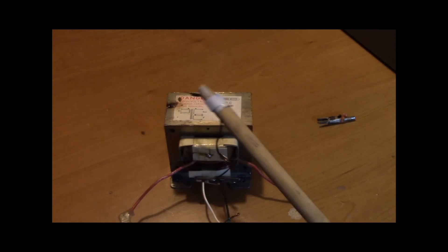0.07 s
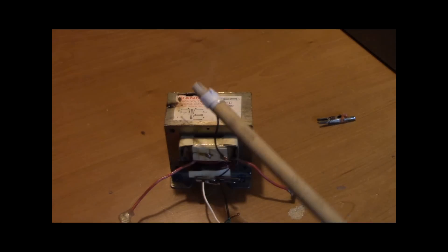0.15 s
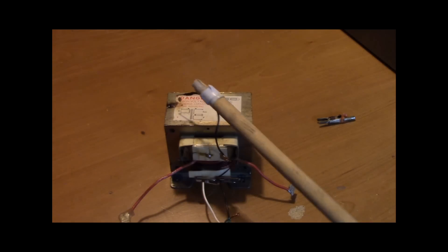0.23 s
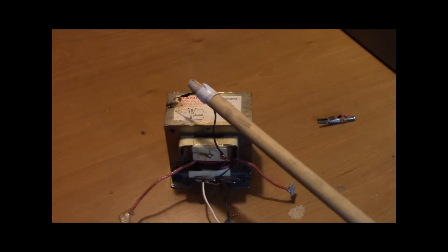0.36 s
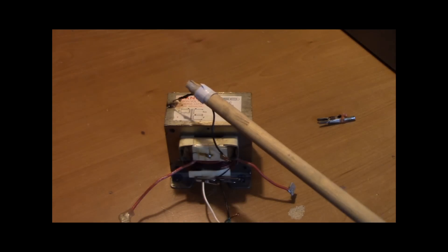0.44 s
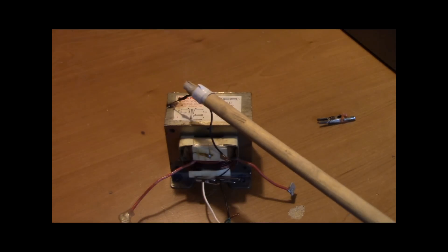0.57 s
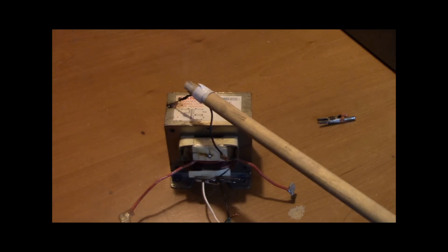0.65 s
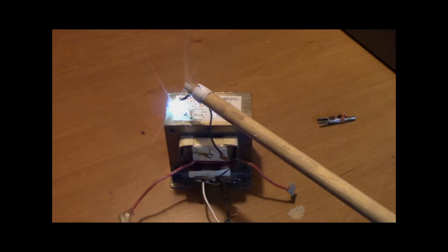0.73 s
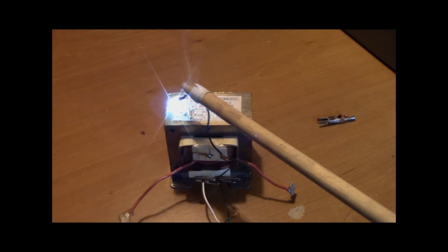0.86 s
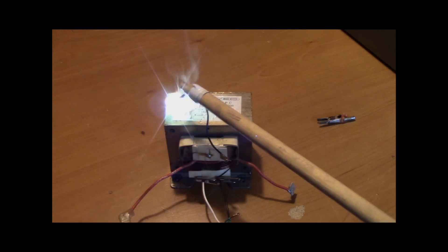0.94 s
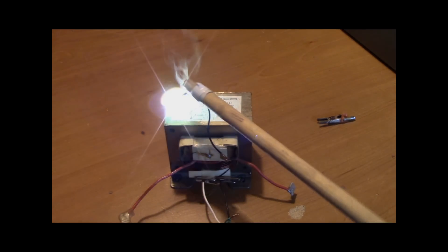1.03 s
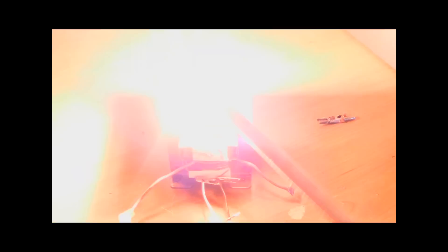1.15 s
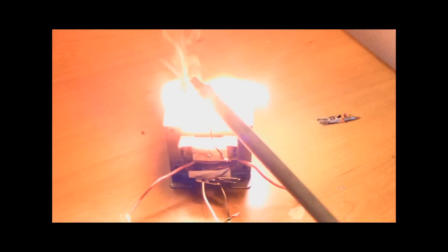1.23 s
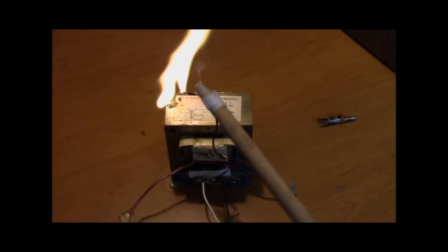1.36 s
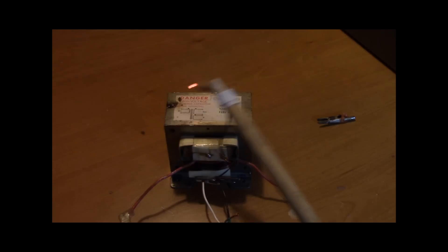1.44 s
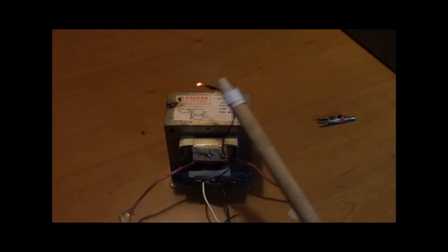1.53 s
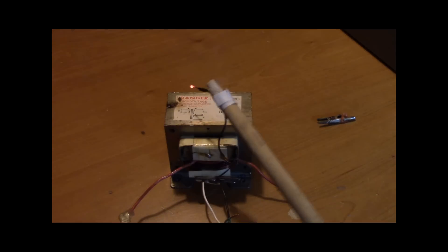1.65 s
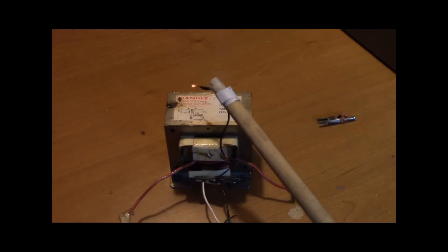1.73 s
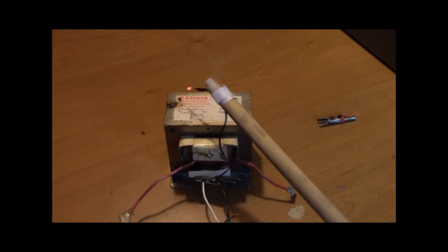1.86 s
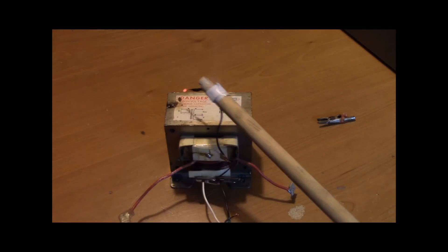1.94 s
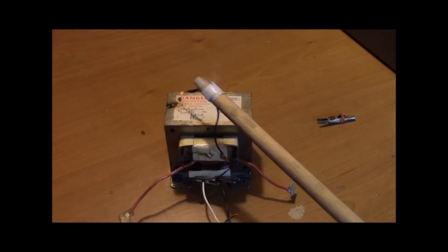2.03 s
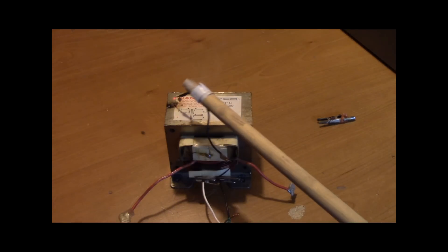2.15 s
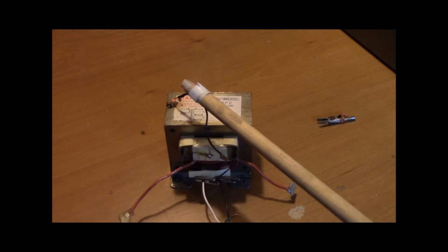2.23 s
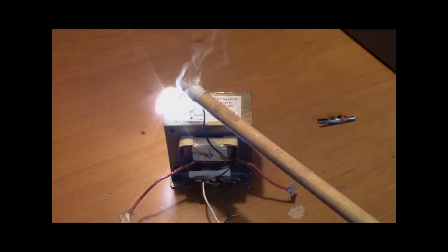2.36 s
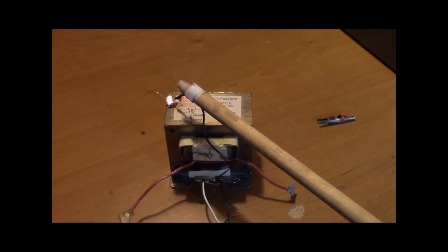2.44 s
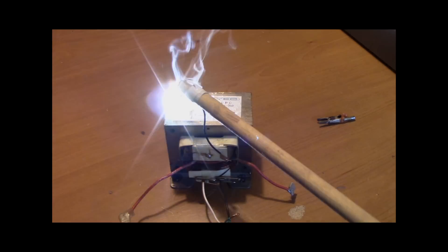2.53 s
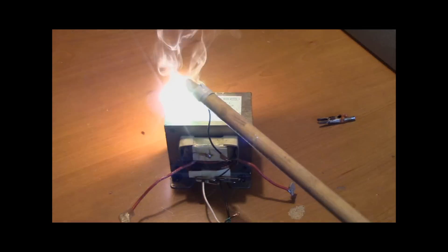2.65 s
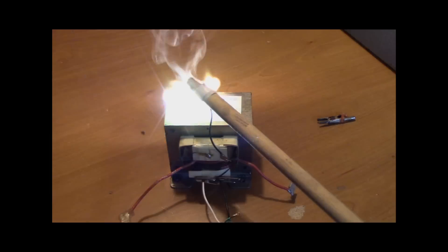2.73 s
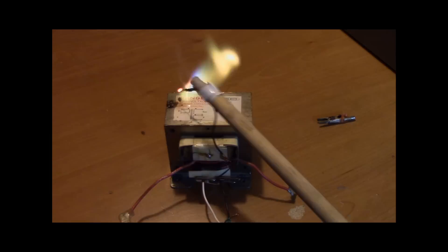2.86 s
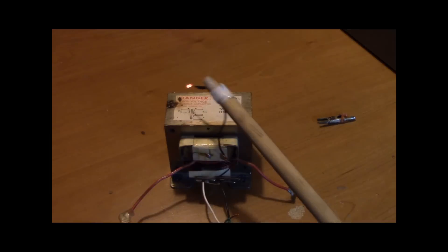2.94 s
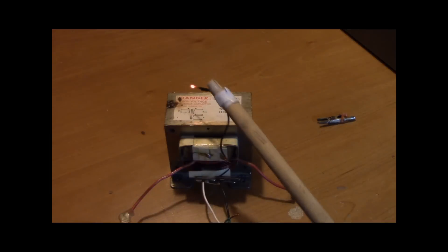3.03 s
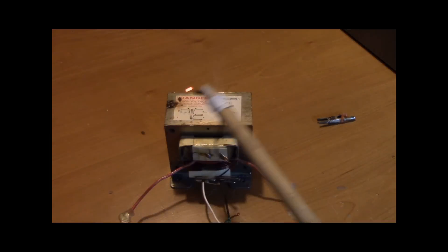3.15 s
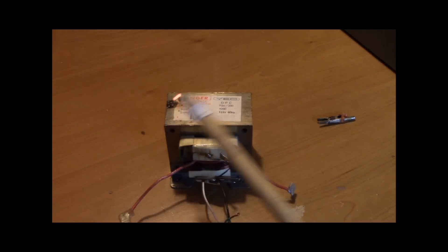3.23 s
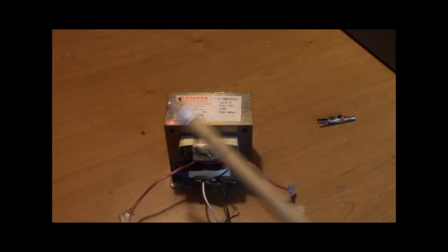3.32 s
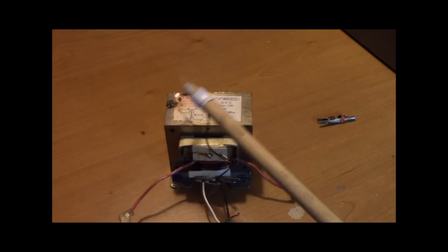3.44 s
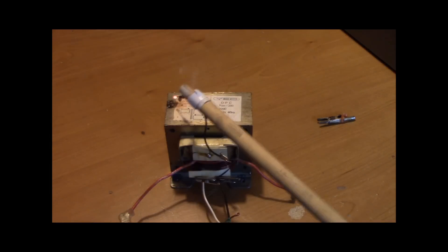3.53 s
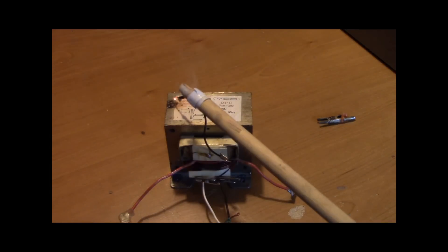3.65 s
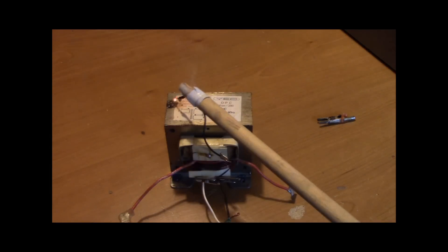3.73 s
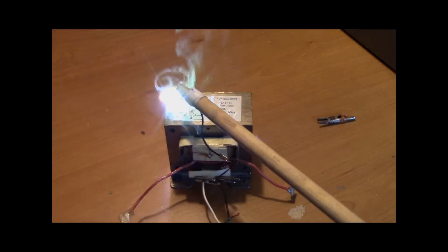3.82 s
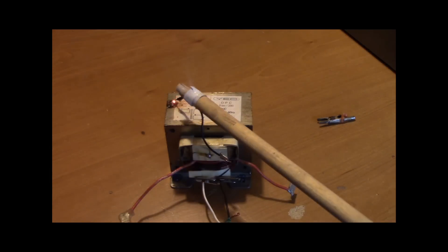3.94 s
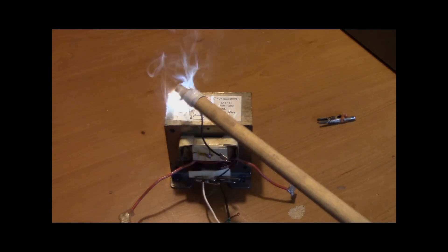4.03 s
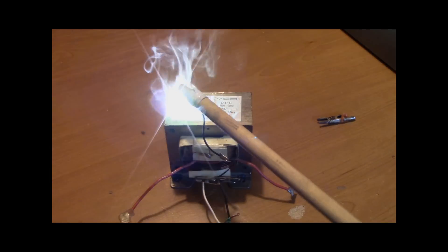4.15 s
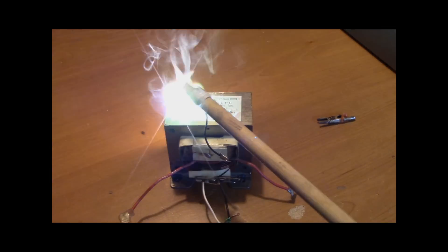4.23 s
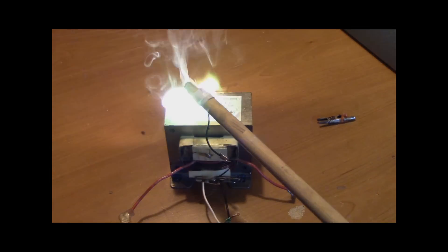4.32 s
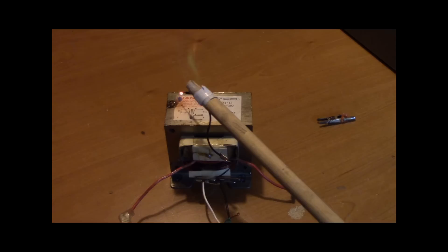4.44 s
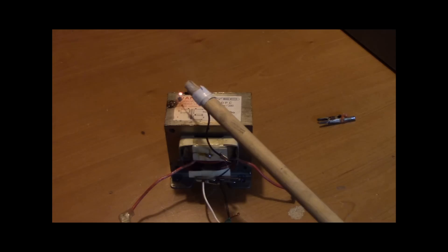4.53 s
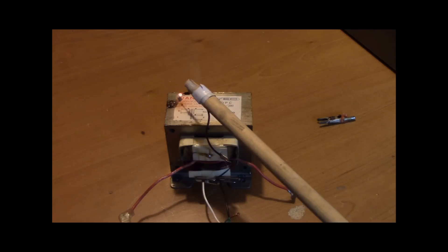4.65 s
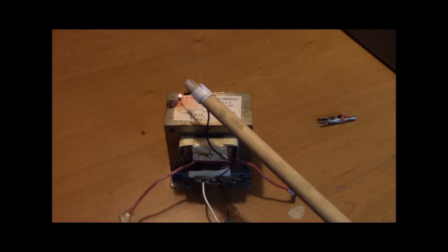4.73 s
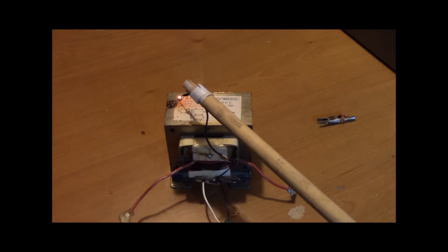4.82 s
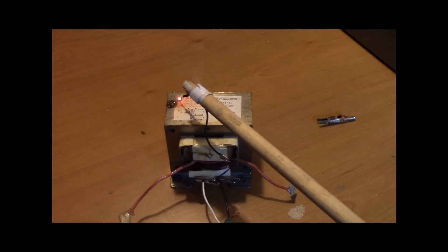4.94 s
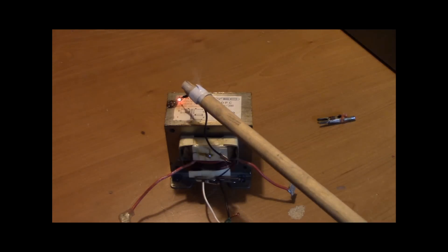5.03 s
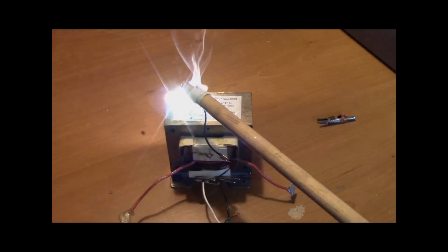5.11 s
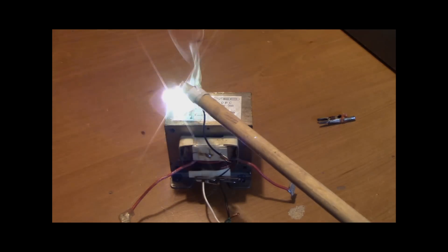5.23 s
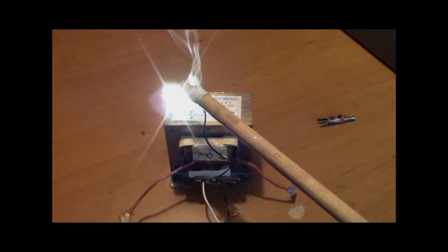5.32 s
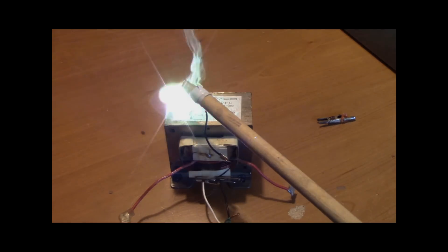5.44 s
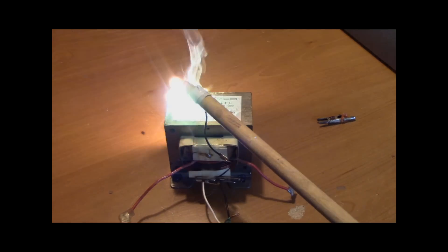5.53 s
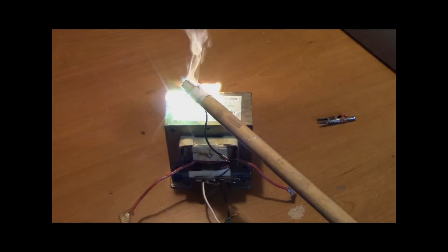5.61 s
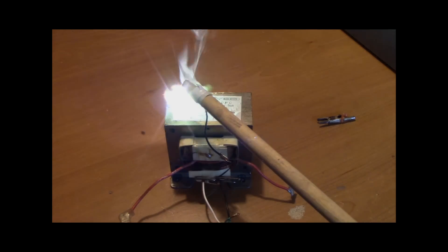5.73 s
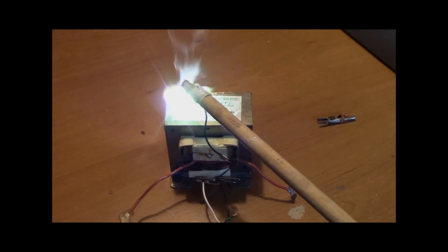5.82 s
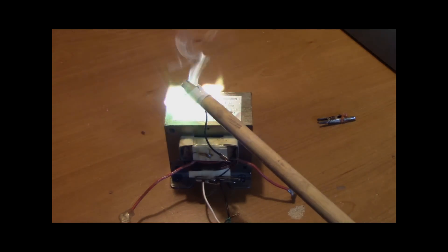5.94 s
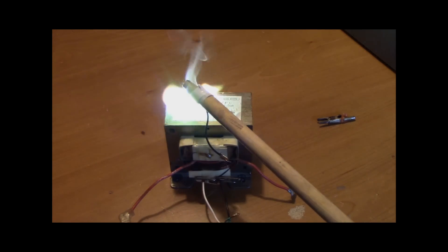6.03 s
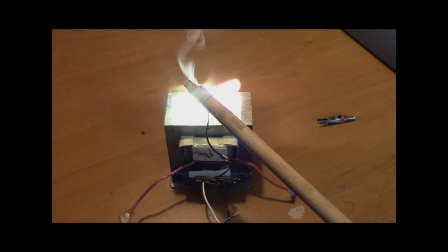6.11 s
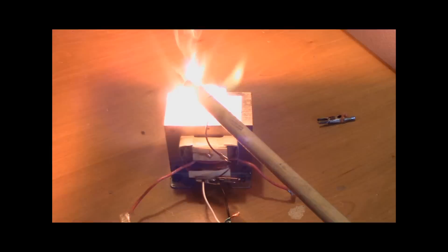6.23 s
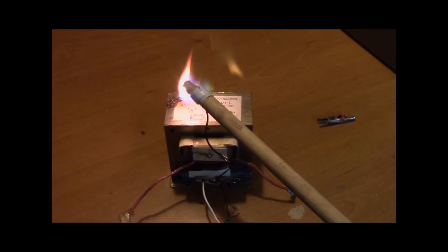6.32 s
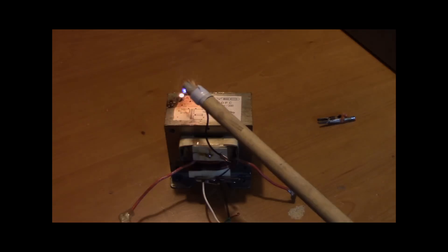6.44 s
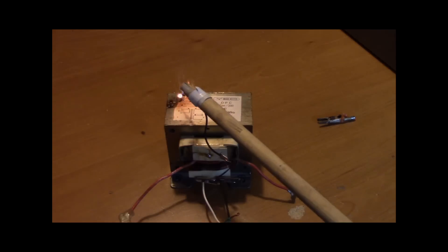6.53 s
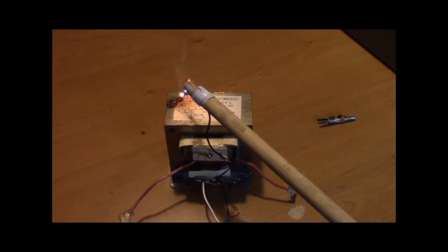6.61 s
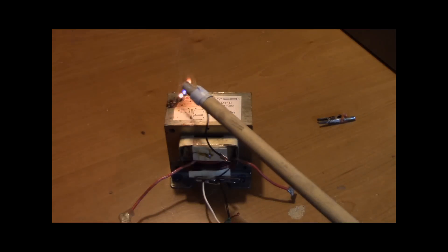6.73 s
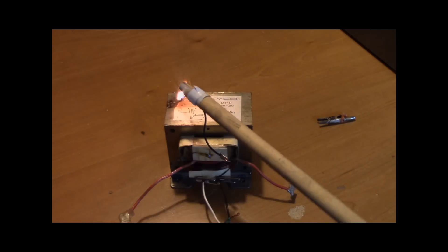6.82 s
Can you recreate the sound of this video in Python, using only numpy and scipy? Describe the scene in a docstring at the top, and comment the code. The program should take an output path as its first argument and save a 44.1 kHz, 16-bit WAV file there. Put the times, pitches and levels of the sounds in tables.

```python
"""Arcs drawn from a humming transformer

A mains transformer hums on a wooden table in a small, dry room; a hand-held electrode draws arcs from it.
Gas breakdown cracks in each half-cycle, tiny sparks sizzle, and heated air buzzes at twice the mains rate:
all are pulse trains convolved with a pressure pulse and a room response. Around them are sine-wave hum and
gliding whistles, ticks and a pop made as struck responses, and spectrally shaped noise as room tone."""
import sys
import numpy as np
from scipy import signal
from scipy.fft import rfft, irfft
from scipy.io import wavfile

SR = 44100
rng = np.random.default_rng(int(sys.argv[2]) if len(sys.argv) > 2 else 0)


def wav_out(sig):
    """Save sig, one row per channel (or a flat mono array), as 16-bit PCM at SR to the path in sys.argv[1]."""
    wavfile.write(sys.argv[1], SR, np.round(np.clip(np.atleast_2d(sig).T, -1, 1) * 32767).astype(np.int16))


N = 302967

MAINS_HZ = 60.01
FIRST_STRIKE_S = .0033  # nominal moment of breakdown within the first mains cycle

# Levels of the burning arcs, one list per arc.
# Each row: time in seconds, restrike level in dB, buzz level in dB.
ARC_LEVELS = [
    [(0.96, -16, -38.5), (1.05, -11.5, -27.5), (1.102, -13, -16), (1.126, -25, -13), (1.216, -30.5, -19.5),
     (1.242, -27, -27), (1.268, -35, -12), (1.336, -27.5, -21.5)],
    [(2.278, -17, -17.5), (2.372, -20, -28.5)],
    [(2.553, -22.5, -27), (2.685, -16, -17.5), (2.771, -25.5, -19), (2.795, -15, -19.5), (2.816, -35, -24)],
    [(3.795, -22.5, -25.5), (3.857, -15.5, -29), (3.872, -21, -41.5)],
    [(4.052, -18.5, -40), (4.2, -10.5, -28), (4.27, -14.5, -19.5), (4.405, -17, -18)],
    [(5.122, -15, -20.5), (5.18, -12.5, -19), (5.276, -16, -42.5), (5.296, -27.5, -39), (5.312, -13.5, -49),
     (5.45, -13, -34), (5.528, -12.5, -23.5), (5.7, -13.5, -22.5), (5.8, -13, -25.5), (6.04, -15.5, -18.5),
     (6.08, -15, -15.5), (6.176, -13, -19.5), (6.212, -25.5, -19), (6.23, -12, -20), (6.272, -31, -17)],
]
# Dullness that each arc has from its start. Each entry: share of dulled sound, 0 to 1.
ARC_THICKNESS = [0.18, 0.042, 0.17, 0.084, 0.16, 0.031]


def arc_levels():
    """Channel growth: the louder the buzz of a long arc, the duller its sparks."""
    strike_db, buzz_db = in_time(ARC_LEVELS)
    spans = [[(rows[0][0], share), (rows[-1][0], share)]
             for rows, share in zip(ARC_LEVELS, ARC_THICKNESS)]
    thick, = in_time(spans)
    dulling_starts_db, dulling_per_db = -28, .025
    dull = thick + dulling_per_db * np.maximum(buzz_db - dulling_starts_db, 0)
    return strike_db, buzz_db, dull


# Loudest cracks. Each row: time in seconds, peak in dB before dulling and the room.
LOUD_CRACKS = [(0.7, -28), (0.948, -9), (0.961, 2.5), (0.977, 5), (1.107, 9), (1.126, 11.5), (1.232, -7),
               (1.26, 2.5), (1.274, -2.5), (2.268, -18.5), (2.278, 3), (2.296, 5.5), (2.309, 7.5),
               (2.345, 5.5), (2.36, 2.5), (2.52, -1), (2.56, 4.5), (2.578, 7), (2.61, 5.5), (2.629, 9),
               (2.725, 7.5), (2.777, 5.5), (2.794, 3), (3.785, -4), (3.803, 4), (3.845, 2.5), (3.98, -19),
               (4.052, 3), (4.069, 1), (4.101, 1.5), (4.142, 2), (4.293, 8.5), (4.343, 8), (4.392, 8),
               (5.099, -12.5), (5.125, 7.5), (5.308, 5.5), (5.493, 4.5), (5.958, 5.5), (6.058, 5),
               (6.225, 4.5), (6.242, 2.5)]
# Spectrum of one spark. Each row: frequency in Hz, relative level in dB per Hz.
SPARK_SPECTRUM = [(40, -7.5), (100, -17), (300, -12.5), (550, -9.5), (1200, -6), (2200, -5.5), (4500, -6.5),
                  (7000, -7.5), (10000, -14.5), (16000, -25.5)]


def loud_cracks(dull):
    """Impulse radiation: a sudden breakdown sends out one sharp pressure pulse."""
    struck = dulled(clicks(LOUD_CRACKS), dull, edge_hz=3740)
    return through(struck, through(pulse(SPARK_SPECTRUM), room()))


# Balance of the two polarities, held until the next row.
# Each row: start in seconds, share of the breakdown energy in the first half-cycle, 0 to 1.
POLARITY_BALANCE = [(0, .05), (1.15, .5), (2.2, .06), (2.67, .35), (3.7, .6), (4.0, .95), (4.14, .06),
                    (5.1, .6), (5.31, .05), (5.55, .6), (5.9, .22)]


def restrikes():
    """Periodic gas breakdown: one strike per half-cycle, uneven in polarity, with gaps for loud cracks."""
    at = half_cycles(jitter_s=.0006)
    since, shares = np.transpose(POLARITY_BALANCE)
    first = shares[np.searchsorted(since, at / SR, side="right") - 1]
    share = np.where(np.arange(len(at)) % 2 == 0, first, 1 - first)
    distance_s = np.abs(at[:, None] / SR - np.array(LOUD_CRACKS)[:, 0]).min(axis=1)
    free = distance_s > .005
    uneven = from_db(1.8 * rng.standard_normal(len(at)))
    out = np.zeros(N)
    out[at] = free * np.sqrt(share) * uneven
    return out


def sizzle(per_s, pulsing):
    """Random point process: dense tiny sparks, thickest 2 ms after each nominal breakdown."""
    phase = 4 * np.pi * MAINS_HZ * (np.arange(N) / SR - FIRST_STRIKE_S - .002)
    chance = per_s / SR * (1 + np.clip(pulsing, 0, 1) * np.cos(phase))
    born = rng.random(N) < chance
    sizes = born * from_db(4.2 * np.minimum(rng.exponential(1, N), 5))
    return (sizes - 0.5 * sizes.mean()) * from_db(2.0 * drift(30))


def puffs():
    """Thermal expansion: the channel heats the air twice a cycle, unequally; turbulence adds noise."""
    out = 0.067 * rng.standard_normal(N) * from_db(4.05 * drift(23))
    at = half_cycles(jitter_s=.0003)
    polarity_db = -3.0 * (np.arange(len(at)) % 2)
    out[at] += from_db(polarity_db + 0.79 * rng.standard_normal(len(at)))
    return out


# Spectrum of one puff of heated air. Each row: frequency in Hz, relative level in dB per Hz.
BUZZ_SPECTRUM = [(25, -16), (60, -21), (120, -6), (240, 1.5), (500, 2), (1000, -4), (1800, -12.5),
                 (4000, -41)]


def buzz(buzz_db):
    """Pulsed volume source: air puffs at twice the mains rate make a low, partly dulled buzz."""
    return wandering(dulled(puffs(), .4, edge_hz=350), buzz_db, BUZZ_SPECTRUM)


# Fine fizz of tips almost touching. Each row: start in seconds, length in seconds, level in dB.
FIZZ_SPANS = [(0.697, 0.29, -30.5), (2.265, .012, -20.5), (2.461, 0.12, -26), (3.785, 0.013, -23.5),
              (3.979, .06, -28), (5.098, 0.02, -21)]
# Spectrum of one fizz spark. Each row: frequency in Hz, relative level in dB per Hz.
FIZZ_SPECTRUM = [(35, -25.5), (60, -19), (268, -3.5), (294, -8), (371, -16.5), (1060, -9.5), (2050, -12),
                 (6580, -8.5), (16000, -19)]


def fizz():
    """Discharge in a tiny gap: a dense, weakly pulsing train of small sparks."""
    fizz_db, = in_time([[(s, db), (s + length, db)] for s, length, db in FIZZ_SPANS])
    return played(sizzle(per_s=3200, pulsing=.3), fizz_db, through(pulse(FIZZ_SPECTRUM), room()))


# Dull pop of burning wire. The one row: time in seconds, peak in dB before the room.
WIRE_POP = (.826, -26.5)


def wire_pop():
    """Impulse response: one click excites the dull pulse of heated air."""
    return through(clicks([WIRE_POP]), through(pulse(BUZZ_SPECTRUM), room()))


# Core hum. Each row: multiple of the mains rate, mean level in dB rms.
HUM_LINES = [(2, -55.5), (4, -72), (6, -69.5), (8, -75.5), (10, -53.5), (12, -71), (14, -72), (16, -84.5),
             (20, -89)]


def hum():
    """Magnetostriction: the iron core flexes at even multiples of the mains rate, wavering a little."""
    t, out = np.arange(N) / SR, 0
    for multiple, db in HUM_LINES:
        level = np.sqrt(2) * from_db(db + 0.57 * drift(3))
        out = out + level * np.sin(2 * np.pi * (multiple * MAINS_HZ * t + rng.random()))
    return out


# Thin falling whistles. Each row: start in seconds, length in seconds, first frequency in Hz,
# last frequency in Hz, exponent of the glide, mean level in dB rms at mid-length.
FALLING_WHISTLES = [(1.39, 0.24, 10300, 8150, 3.2, -62.5), (1.46, .19, 8650, 7750, 2.6, -71),
                    (1.65, .2, 9800, 8500, 1.6, -76), (1.75, .27, 13100, 7700, 1.25, -69),
                    (4.46, .17, 9500, 8000, 2.6, -64), (4.55, .15, 10600, 7600, 1.05, -71),
                    (4.47, .15, 14200, 11900, 2.2, -72), (4.62, 0.13, 13200, 9400, 1.3, -69),
                    (4.73, .08, 10900, 9100, 1.05, -68)]


def whistles():
    """Frequency modulation: sines fall ever faster, swell in the middle, flicker and wobble."""
    out, flicker_db, wobble_hz = np.zeros(N), 2.1 * drift(40), 50 * drift(80)
    for s, length, first_hz, last_hz, bend, db in FALLING_WHISTLES:
        on = slice(round(s * SR), round((s + length) * SR))
        done = np.linspace(0, 1, on.stop - on.start)
        hz = first_hz + (last_hz - first_hz) * done ** bend + wobble_hz[on]
        swell_db = -5 * (2 * done - 1) ** 2
        level = from_db(db + swell_db + flicker_db[on])
        out[on] += np.sqrt(2) * level * np.sin(2 * np.pi * np.cumsum(hz) / SR)
    return out


# Ticks of cooling metal. Each row: time in seconds, strike level in dB on the first mode,
# brightness in dB added per further mode.
METAL_TICKS = [(.115, -52, -0.5), (1.447, -57, 3.5), (3.025, -59.5, 2), (3.158, -61.5, 2), (3.208, -60, 1)]
# Modes of the metal. Each row: frequency in Hz, time to fall by 60 dB in seconds.
METAL_MODES = [(3300, .006), (4000, .006), (6900, .006), (8400, .004), (11000, .003)]


def ticks():
    """Modal excitation: a short scrape rings the same few modes; close by, so with little room."""
    t, out = np.arange(SR // 10) / SR, 0
    grains = rng.standard_normal(len(t)) * (rng.random(len(t)) < .03)
    scrape = grains * from_db(-60 * t / .03)
    scrape[0] = 1
    for k, (hz, t60) in enumerate(METAL_MODES):
        struck = clicks([(s, db + k * tilt_db) for s, db, tilt_db in METAL_TICKS])
        ringing = np.sin(2 * np.pi * hz * t) * from_db(-60 * t / t60)
        out = out + signal.oaconvolve(struck, ringing)[:N]
    out = through(out, scrape)
    return out + from_db(-8.5) * through(out, room())


# Early echoes off core, table and walls. Each row: mean delay in milliseconds,
# level in dB relative to the direct sound.
EARLY_ECHOES = [(.31, -1), (1.97, -1.5), (2.19, -4), (2.83, -9), (3.38, -12), (3.97, -11), (8.8, -13),
                (10.63, -11)]
# Decay of the diffuse tail. Each row: frequency in Hz, time to fall by 60 dB in seconds.
TAIL_DECAY = [(100, 0.54), (260, 0.32), (700, 0.26), (1840, 0.19), (4850, 0.21), (12800, 0.14)]
# Room resonances. Each row: frequency in Hz, width in Hz, level in dB before a common gain.
ROOM_RESONANCES = [(120, 14, -3), (180, 16, -6), (241, 8, 2), (300, 16, -3), (335, 22, -1), (455, 27, -2),
                   (550, 30, 1), (633, 18, -2), (721, 20, -4), (860, 28, -2), (1040, 40, -1),
                   (1400, 45, -2), (1790, 40, -4), (2570, 40, -8), (2730, 40, -8), (3275, 90, -4),
                   (4640, 200, 0)]


def room():
    """Reverberation: direct sound, early echoes, a tail dying band by band, and separate resonances."""
    t = np.arange(SR // 2) / SR
    tail, edges = 0, 44 * 2.0 ** np.arange(10)  # octave bands
    for low, high in zip(edges, np.minimum(edges[1:], .45 * SR)):
        octave = signal.butter(2, [low, high], "band", fs=SR, output="sos")
        band = signal.sosfilt(octave, rng.standard_normal(len(t)))
        tail = tail + band * from_db(-60 * t / at_hz(TAIL_DECAY, np.sqrt(low * high)))
    tail = signal.lfilter(*signal.butter(1, 340, "high", fs=SR), tail)
    tail = tail * np.clip(t / .005, 0, 1)  # builds up over 5 ms
    response = from_db(4.5) * tail / np.sqrt(np.sum(tail ** 2))
    response[0] = 1
    for ms, db in EARLY_ECHOES:
        # the source never sits twice in the same spot, so each path differs slightly
        shifted_ms = ms + .015 * np.sqrt(ms) * rng.standard_normal()
        response[round(shifted_ms * SR / 1000)] += from_db(db)
    for k, (hz, width, db) in enumerate(ROOM_RESONANCES):
        ringing = np.sin(2 * np.pi * hz * t) * np.exp(-np.pi * width * t)
        response += (-1) ** k * from_db(db + 8.5) * 2 * np.pi * width / SR * ringing
    return response


# Spectrum of the background. Each row: frequency in Hz, relative level in dB per Hz.
ROOM_TONE_SPECTRUM = [(10, -26.5), (18, -3), (35, 3.5), (70, -4), (100, -18), (200, -17.5), (400, -26.5),
                      (800, -31), (1600, -35), (1890, -32.5), (2200, -37.5), (7000, -41.5), (13300, -46),
                      (14500, -77.5)]


def room_tone():
    """Filtered noise: rumble of the building and microphone hiss share one shaped spectrum."""
    shape = from_db(at_hz(ROOM_TONE_SPECTRUM, np.arange(N // 2 + 1) * SR / N))
    noise = irfft(rfft(rng.standard_normal(N)) * shape, N)
    return from_db(-43.5) * rms_one(noise)


def dulled(x, share, edge_hz):
    """Low-pass filtering: a long, fat arc channel gives slower pressure fronts, so less treble."""
    share = np.clip(share, 0, 1)
    soft = signal.sosfilt(signal.butter(2, edge_hz, fs=SR, output="sos"), x)
    return (1 - share) * x + share * soft


def wandering(source, level_db, spectrum):
    """Equal-power panning: the arc wanders between two spots, each with its own path in the room."""
    angle = np.pi / 4 * (1 + np.tanh(drift(3.8)))
    out = 0
    for share in (np.cos(angle), np.sin(angle)):
        spot_db = level_db + 20 * np.log10(share + 1e-6)
        out = out + played(source, spot_db, through(pulse(spectrum), room()))
    return out


def played(source, level_db, response):
    """Linear convolution: the levelled source through a response, scaled by its first two seconds."""
    reference = np.std(signal.fftconvolve(source[:2 * SR], response, "valid"))
    return through(source * from_db(level_db), response) / reference


def half_cycles(jitter_s):
    """Alternating-current timing: the sample of each breakdown, a little early or late."""
    count = int(2 * MAINS_HZ * N / SR) - 2
    s = FIRST_STRIKE_S + np.arange(count) / (2 * MAINS_HZ)
    return np.clip((s + jitter_s * rng.standard_normal(len(s))) * SR, 0, N - 1).astype(int)


def clicks(rows):
    """Unit impulses: one sample per event, scaled by its level in dB."""
    out = np.zeros(N)
    for s, db in rows:
        out[round(s * SR)] = from_db(db)
    return out


def pulse(spectrum, size=8192):
    """Minimum phase: the causal pulse that has this spectrum, scaled to peak 1."""
    log_gain = at_hz(spectrum, np.arange(size // 2 + 1) * SR / size) * np.log(10) / 20
    cepstrum = irfft(log_gain)
    cepstrum[1:size // 2] *= 2  # fold onto positive times
    shape = irfft(np.exp(rfft(cepstrum[:size // 2 + 1], size)))
    return shape / shape.max()


def through(x, response):
    """Linear filtering: the signal convolved with an impulse response."""
    return signal.fftconvolve(x, response)[:N]


def drift(rate):
    """Low-pass noise: slow chance of spread 1, with its two poles at this rate in Hz."""
    r = np.exp(-80 * np.pi * rate / SR)  # computed at every 40th sample
    slow = signal.lfilter([1], [1, -2 * r, r * r], rng.standard_normal(N // 40 + 2002))[2000:]
    return np.interp(np.arange(N) / 40, np.arange(len(slow)), rms_one(slow))


def in_time(tables, silent=-120):
    """Linear interpolation: columns of all tables along the time axis, silent between the tables."""
    t = np.arange(N) / SR
    out = np.full((len(tables[0][0]) - 1, N), float(silent))
    for rows in tables:
        s, *columns = np.transpose(rows)
        on = (t >= s[0]) & (t <= s[-1])
        out[:, on] = [np.interp(t[on], s, c) for c in columns]
    return out


def at_hz(points, hz):
    """Logarithmic frequency: values read between points on a log-frequency axis."""
    hz_points, values = np.transpose(points)
    return np.interp(np.log(hz + 1), np.log(hz_points), values)


def from_db(db):
    """Decibel law: amplitude ratio of a level."""
    return 10 ** (np.asarray(db) / 20)


def rms_one(x):
    """Normalization: the signal scaled to an rms of 1."""
    return x / np.sqrt(np.mean(x ** 2) + 1e-20)


def scene():
    """Superposition: each kind of spark has its own paths in the room; arc pressure is inverted."""
    strike_db, buzz_db, dull = arc_levels()
    arc = wandering(dulled(restrikes(), dull, edge_hz=3480), strike_db, SPARK_SPECTRUM)
    arc += loud_cracks(dull)
    tiny_sparks = dulled(sizzle(per_s=2200, pulsing=.9), dull, edge_hz=3500)
    arc += wandering(tiny_sparks, strike_db - 9, SPARK_SPECTRUM)
    arc += fizz()
    arc += buzz(buzz_db)
    arc += wire_pop()
    return (ticks() - arc + hum() + whistles() + room_tone())[None]


def record(dry):
    """Saturation and band limits: peaks clip just under full scale, steady pressure and top are cut."""
    limited = dry / (1 + (dry / .96) ** 6) ** (1 / 6)
    coupled = signal.lfilter(*signal.butter(1, 8, "high", fs=SR), limited)
    return signal.sosfilt(signal.ellip(10, .3, 70, 15900, fs=SR, output="sos"), coupled)


dry = scene()
out = record(dry)
wav_out(out)
```